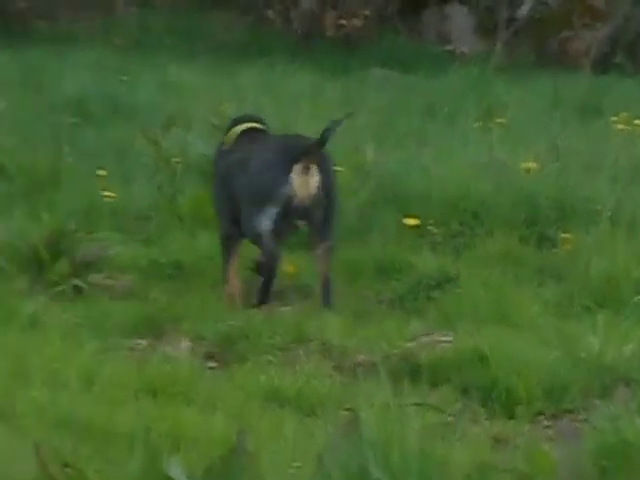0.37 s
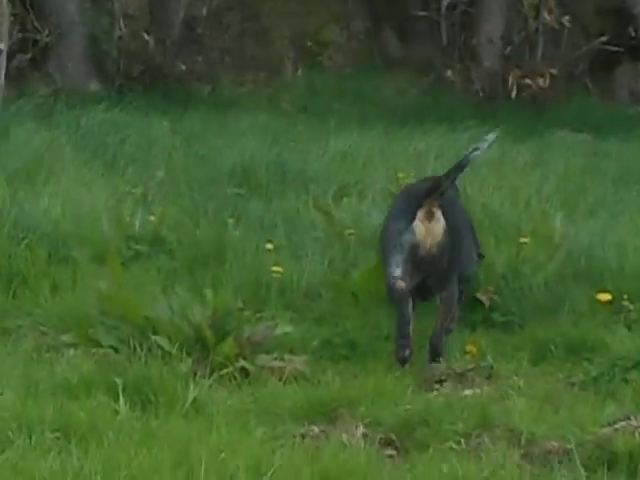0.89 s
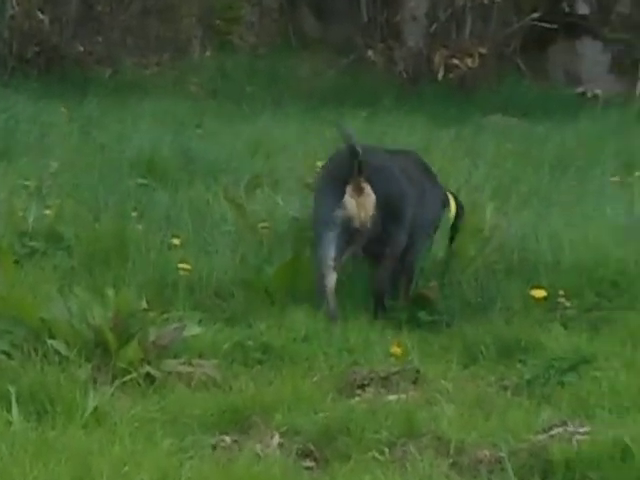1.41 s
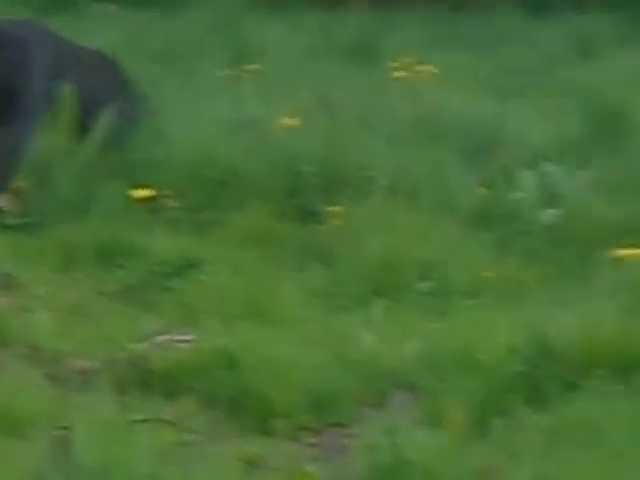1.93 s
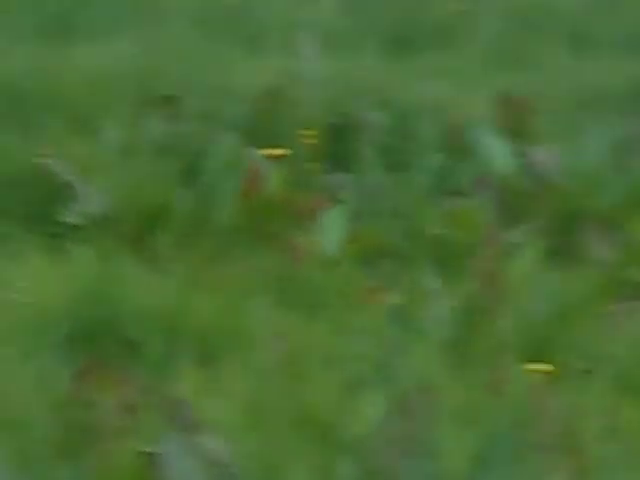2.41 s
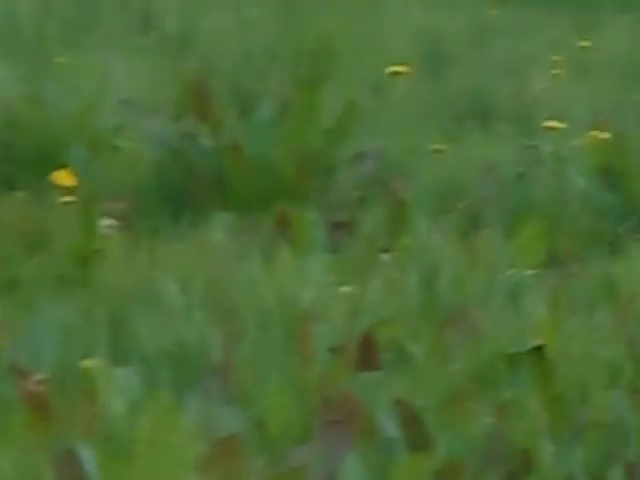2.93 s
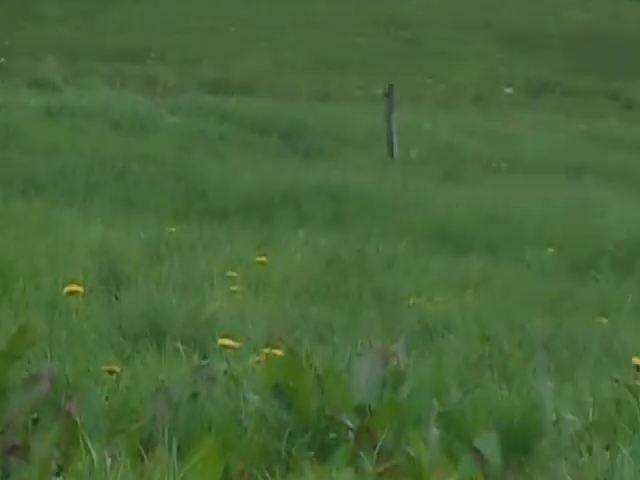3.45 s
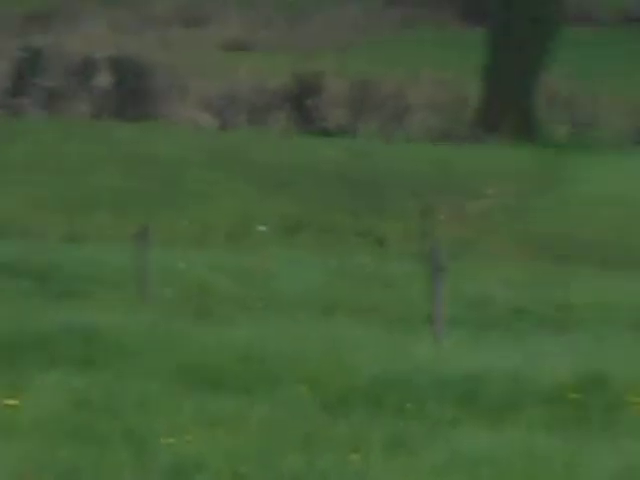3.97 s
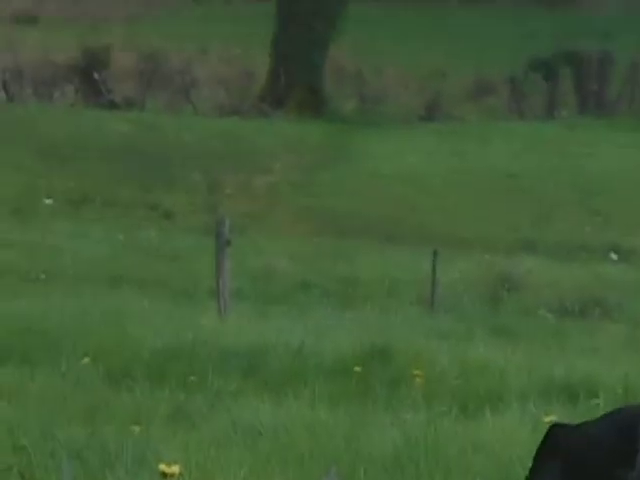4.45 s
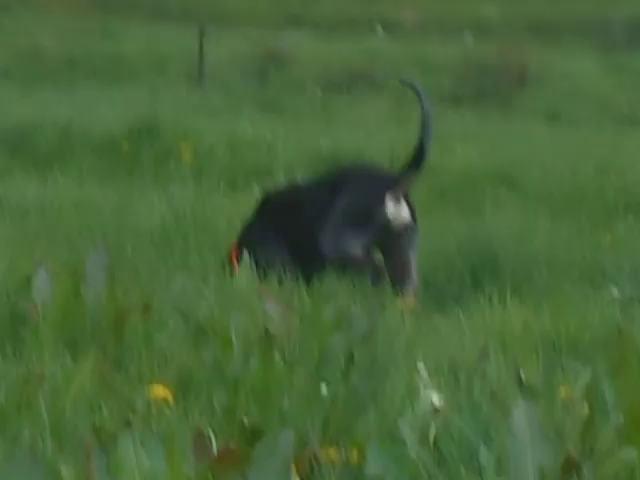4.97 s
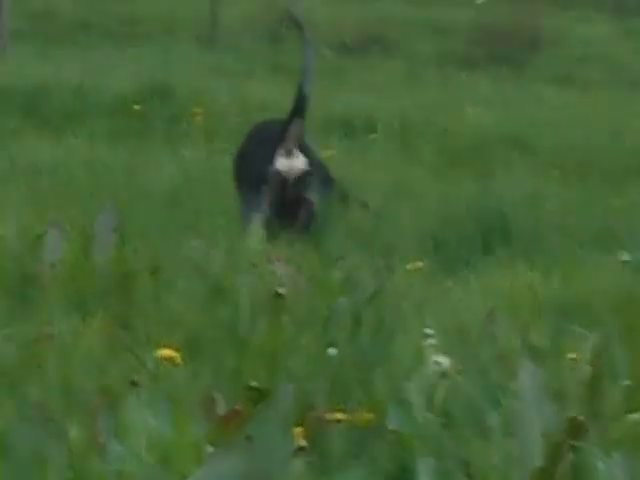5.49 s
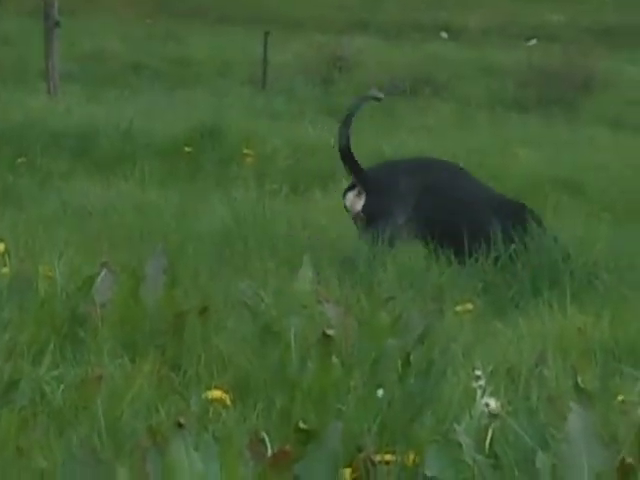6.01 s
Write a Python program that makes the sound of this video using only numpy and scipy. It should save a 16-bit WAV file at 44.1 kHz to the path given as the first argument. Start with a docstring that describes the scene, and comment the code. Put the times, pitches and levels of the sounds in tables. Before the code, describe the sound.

A breezy open meadow with a soft, steady, distant noise drone. Small birds chirp from the start, clearest near 1.0-1.4 s, then fainter from 3.9 s to the end. From 0.1 s a far hammer strikes a steel post roughly every 0.57 s, eight blows ending at 4.1 s; the one at 1.8 s is loudest. Each is a hard bright crack with short metallic ringing, a quick hedge echo and a diffuse tail from the woods. A brief wind pop comes at 0.27 s. Just after 1.8 s something close snaps drily, then hollow scuffs and hissing rubs fade by 2.4 s. Tiny bright ticks occur irregularly. Wind pops the microphone around 3.4 s, then returns from 4.8 s in crowded, low, blunt bursts, strongest from 5.1 to 5.9 s, with a soft swish near 5.0 s. A brighter noisy hum grows at the end.

```python
"""A breezy meadow. Over a soft, distant drone of shaped noise, small birds whistle gliding sines from the start.
A far hammer then strikes a steel post about twice a second: noise bursts, ringing modes and echoes off hedge and woods.
Wind rumbles as gusty noise and pops as short wavelets, while small bright ticks of noise sound now and then.
Before two seconds something close by snaps and scuffs: an abrupt noise burst, then noise around a moving resonance.
Late on the wind pops crowd together and a brighter hum of noise grows."""
import sys
import numpy as np
from scipy import signal
from scipy.fft import rfft, irfft
from scipy.io import wavfile

SR = 44100
rng = np.random.default_rng(int(sys.argv[2]) if len(sys.argv) > 2 else 0)


def volts_from_db(level):
    """Convert decibel levels to linear amplitude ratios."""
    exponent = np.asarray(level, float) / 20
    return 10 ** exponent


def persist_wave(psi):
    """Save psi, clipped to +-1, as 16-bit WAV."""
    counts = np.round(np.clip(psi, -1, 1) * 32767).astype(np.int16)
    wavfile.write(sys.argv[1], SR, np.atleast_2d(counts).T)


N = 269802


def rms_one(x):
    """Normalisation: divides a signal by its root mean square."""
    return x / np.sqrt(np.mean(x ** 2) + 1e-20)


def in_time(rows):
    """Linear interpolation of (time_s, value) rows at every sample."""
    s, value = np.transpose(rows)
    return np.interp(np.arange(N) / SR, s, value)


def coloured(spectrum, size=N):
    """Spectral shaping: white noise filtered to the given spectrum, rms 1."""
    hz, db = np.transpose(spectrum)
    grid_hz = np.maximum(np.arange(size // 2 + 1) * SR / size, 1)
    # levels follow log frequency and drop 30 dB outside the table
    gain_db = np.interp(np.log(grid_hz), np.log(hz), db, db[0] - 30, db[-1] - 30)
    return rms_one(irfft(rfft(rng.standard_normal(size)) * volts_from_db(gain_db), size))


def drift(rate_hz):
    """Random modulation: noise through a double-pole low-pass, rms 1."""
    r = np.exp(-2 * np.pi * rate_hz / SR)
    noise = rng.standard_normal(N + SR)
    return rms_one(signal.lfilter([1], [1, -2 * r, r * r], noise)[SR:])


def ring(x, hz, t60):
    """Damped resonance: a unit click starts a sine of height 1 that falls 60 dB in t60 seconds."""
    r = volts_from_db(-60 / (t60 * SR))
    w = 2 * np.pi * hz / SR
    return signal.lfilter([0, np.sin(w)], [1, -2 * r * np.cos(w), r * r], x)


def burst(t, rise, fall):
    """Exponential build-up and decay from t = 0, with time constants in seconds."""
    t = np.maximum(t, 0)
    return (1 - np.exp(-t / rise)) * np.exp(-t / fall)


def wavelet(t, hz, turns, phase):
    """Time-limited oscillation: a few turns of a tone under a Gaussian bell."""
    return np.exp(-(t * hz / turns) ** 2) * np.cos(2 * np.pi * hz * t + phase)


def stroke(length):
    """Friction envelope: swells, holds and fades along squared sines."""
    rise_share, fade_share = 0.12, 0.5
    u = np.linspace(0, 1, round(length * SR))
    ramps = np.minimum(u / rise_share, (1 - u) / fade_share)
    return np.sin(np.pi / 2 * np.clip(ramps, 0, 1)) ** 2


def add(out, sound, s):
    """Superposition: adds a sound to out, starting s seconds in."""
    at = max(round(s * SR), 0)
    out[at:at + len(sound)] += sound[:N - at]


# spectrum of the distant drone: pitch_hz [Hz], level_db [dB per Hz]
DRONE_SPECTRUM = [(120, -37.5), (200, -20), (487, -7), (1200, 3.5), (1490, -5), (2370, -5), (2610, -7),
                  (6580, -16.5), (8990, -23.5), (10300, -32.5), (13300, -55.5), (22000, -120)]
# course of the drone: time_s [s], level_db [dB]
DRONE_COURSE = [(0.0, -57), (1.87, -58), (5.45, -58), (6.12, -57)]


def drone():
    """Stationary noise: a fixed spectrum whose level wanders slowly."""
    return volts_from_db(in_time(DRONE_COURSE) + 0.56 * drift(3.4)) * coloured(DRONE_SPECTRUM)


# course of the brighter hum: time_s [s], level_db [dB]
HUM_COURSE = [(4.5, -73), (5.4, -68.5), (5.9, -60), (6.12, -61)]
# spectrum of the brighter hum: pitch_hz [Hz], level_db [dB per Hz]
HUM_SPECTRUM = [(700, -19), (1300, 0.5), (2000, -2.5), (2600, -10), (4000, -27)]


def hum():
    """Amplitude modulation: mid-band noise that grows towards the end."""
    return volts_from_db(in_time(HUM_COURSE)) * coloured(HUM_SPECTRUM)


# steady breeze: time_s [s], level_db [dB]
BREEZE_COURSE = [(0.0, -78), (1.7, -78), (2.2, -73), (2.7, -77), (3.3, -67.5), (3.75, -71.5), (4.3, -77.5),
                 (5.3, -58), (6.12, -62)]
# puffs of wind: middle_s [s], length_s [s], level_db [dB]
WIND_PUFFS = [(0.275, 0.073, -48), (1.305, 0.19, -74.5), (1.998, 0.046, -66.5), (2.455, .12, -69.5),
              (2.785, 0.075, -63), (3.117, 0.064, -59.5), (3.223, .15, -59), (3.445, 0.13, -49),
              (3.6, 0.054, -64.5), (3.97, 0.13, -58), (4.187, 0.22, -61.5), (4.417, 0.041, -55),
              (4.64, 0.21, -60.5), (4.837, 0.044, -47), (4.99, 0.066, -62), (5.131, 0.084, -44.5),
              (5.245, 0.077, -50), (5.545, 0.073, -42), (5.736, 0.11, -55), (5.889, 0.054, -43.5),
              (6.026, 0.063, -48)]


def gust_strength():
    """Superposed flow: Gaussian puffs ride on a slowly changing breeze."""
    t = np.arange(N) / SR
    gust = volts_from_db(in_time(BREEZE_COURSE))
    for middle, length, db in WIND_PUFFS:
        gust = gust + volts_from_db(db) * np.exp(-(2 * (t - middle) / length) ** 2)
    return gust


# spectrum of wind on the microphone: pitch_hz [Hz], level_db [dB per Hz]
RUMBLE_SPECTRUM = [(15, 1.5), (30, 1), (60, -0.5), (130, -2), (250, -14.5), (450, -17), (900, -49)]


def wind_rumble(gust):
    """Turbulent pressure: low noise follows the gusts with a lumpy level."""
    return gust * volts_from_db(4 * drift(35)) * coloured(RUMBLE_SPECTRUM)


# hard wind pops, before the bass cut: middle_s [s], level_db [dB], pitch_hz [Hz]
HARD_POPS = [(0.255, -33.5, 206), (0.273, -39.5, 171), (3.378, -36, 297), (3.39, -31, 207),
             (3.471, -26.5, 303), (4.825, -31.5, 302), (4.843, -36.5, 253), (4.995, -28.5, 242),
             (5.03, -34, 193), (5.101, -34, 157), (5.126, -20.5, 234), (5.161, -25.5, 271),
             (5.23, -35.5, 230), (5.246, -37, 234), (5.529, -25.5, 180), (5.545, -24.5, 330),
             (5.56, -27.5, 320), (5.697, -32.5, 190.0), (5.748, -21, 330), (5.877, -30.5, 163),
             (5.893, -27, 232), (5.98, -34, 176)]


def wind_pops(gust):
    """Vortex shedding: each eddy pushes the diaphragm a cycle or two, with a sharp edge and a shudder."""
    gap_s, eddy_hz = 0.017, 190
    over_db, spread_db = 6.5, 1.5   # level over the gust, and its spread
    draws = rng.standard_normal((400, 3))
    shed_s = gap_s * (np.arange(len(draws)) + 3 + 0.149 * draws[:, 0])
    gust_db = 20 * np.log10(np.interp(shed_s, np.arange(N) / SR, gust))
    eddy_db = gust_db + over_db + spread_db * draws[:, 1]
    pitches = eddy_hz * np.exp(0.25 * draws[:, 2])
    eddies = [row for row in zip(shed_s, eddy_db, pitches) if row[0] < (N - 1) / SR]
    t = np.arange(-1500, 1500) / SR
    pops = np.zeros(N)
    for (s, db, hz), chance in zip([*HARD_POPS, *eddies], rng.random((500, 4))):
        push = wavelet(t, hz, 0.46, 2 * np.pi * chance[0])
        edge_t = t - 0.0019 * (chance[1] - 0.5)
        edge = wavelet(edge_t, 1.89 * hz, 0.48, 2 * np.pi * chance[2])
        shudder = wavelet(t - 0.007, 1.02 * hz, 2.0, 2 * np.pi * chance[3])
        sharpness = volts_from_db(-7.5 + 0.077 * (db + 31.5))   # harder pops are sharper
        add(pops, volts_from_db(db) * (push + sharpness * edge + volts_from_db(-14) * shudder), s + t[0])
    # the pops carry no deep bass
    return signal.sosfilt(signal.butter(2, 89, "high", fs=SR, output="sos"), pops)


# bird notes: start_s [s], length_s [s], first_hz [Hz], middle_hz [Hz], last_hz [Hz], level_db [dB]
BIRD_NOTES = [(0.019, 0.036, 7230, 6850, 6280, -63.5), (0.069, 0.014, 3010, 2840, 2420, -59),
              (0.634, 0.027, 2750, 2950, 3250, -66), (1.033, 0.067, 3170, 3260, 3340, -52),
              (1.102, 0.028, 3690, 3690, 3480, -56), (1.378, 0.093, 3900, 3840, 4040, -60),
              (1.52, 0.089, 3480, 3420, 3480, -69), (1.67, 0.13, 4880, 4630, 3870, -70),
              (3.89, .086, 7430, 8600, 7530, -72.5), (4.069, 0.07, 7100, 7940, 8550, -73),
              (4.24, .046, 7200, 7050, 6500, -64), (4.607, 0.082, 4330, 4370, 4470, -71),
              (4.824, 0.058, 4440, 4310, 4220, -67), (5.318, 0.095, 4200, 4060, 4150, -68),
              (5.48, .06, 6750, 6400, 5750, -73), (5.52, 0.081, 4100, 4040, 4010, -74),
              (6.034, 0.018, 3580, 3680, 3750, -68), (6.07, 0.042, 4020, 3990, 4000, -60.5)]


def birds():
    """Frequency modulation: sines glide through three pitches, waver on the way here and echo faintly from trees."""
    notes = np.zeros(N)
    for s, length, first, middle, last, db in BIRD_NOTES:
        u = np.linspace(-1, 1, round(length * SR))
        hz = middle + (last - first) / 2 * u + ((first + last) / 2 - middle) * u ** 2
        whistle = np.sin(2 * np.pi * np.cumsum(hz) / SR)
        shape = (1 - u ** 2) ** 0.6   # a smaller power holds the level closer to the ends
        add(notes, volts_from_db(db) * np.sqrt(2) * shape * whistle, s)
    notes = notes * volts_from_db(1.8 * drift(40))
    t = np.arange(SR // 4) / SR
    trees = np.exp(-t / 0.086) * rng.standard_normal(len(t))
    return notes + volts_from_db(-37.5) * signal.fftconvolve(notes, trees)[:N]


# small bright ticks: start_s [s], level_db [dB]
TICK_TIMES = [(0.2044, -44.5), (0.5223, -52.5), (1.4825, -48), (2.106, -43.5), (2.2764, -39), (3.2854, -46),
              (3.912, -50), (4.238, -43), (4.2712, -44.5), (4.377, -62), (4.975, -46), (5.2227, -50)]
# spectrum of a tick: pitch_hz [Hz], level_db [dB per Hz]
TICK_SPECTRUM = [(1000, -23), (3000, -3), (6500, -3), (9000, -5), (10500, -18)]


def ticks():
    """Impulsive excitation: bright noise that dies away within milliseconds."""
    out = np.zeros(N)
    t = np.arange(600) / SR
    for s, db in TICK_TIMES:
        add(out, volts_from_db(db) * burst(t, 0.00037, 0.0012) * coloured(TICK_SPECTRUM, len(t)), s)
    return out


# spectrum of the close snap, before the bass cut: pitch_hz [Hz], level_db [dB per Hz]
SNAP_SPECTRUM = [(88, -52), (150, -28), (736, -10.5), (1490, -6), (2280, -7.5), (2870, 5), (3490, -9),
                 (4090, -1.5), (4970, -18.5), (7600, -9), (10300, -27), (13300, -53.5), (22000, -120)]


def snap():
    """Sudden release: noise climbs and falls exponentially about a sharp peak, with a low wavelet as its body."""
    peak_s, rise_s, fall_s = 1.835, 0.0025, 0.0011
    t = np.arange(N) / SR - peak_s
    envelope = np.exp(-np.abs(t) / np.where(t < 0, rise_s, fall_s))
    crack = volts_from_db(-7.5) * envelope * coloured(SNAP_SPECTRUM)
    dry_crack = signal.sosfilt(signal.butter(2, 1100, "high", fs=SR, output="sos"), crack)
    return dry_crack + volts_from_db(-31.5) * wavelet(t, 378, 0.5, 0)


# spectrum of the wood and earth under the post: pitch_hz [Hz], level_db [dB per Hz]
KNOCK_SPECTRUM = [(500, -27), (800, -13), (980, 3.5), (1300, -8.5), (2100, 0), (2700, -5.5), (4000, -32)]


def knock_noise(size=N):
    """Broad resonance: noise in the colour of the knock, which the scuffs share."""
    return coloured(KNOCK_SPECTRUM, size)


# scuffs: start_s [s], length_s [s], level_db [dB], first_hz [Hz], last_hz [Hz] of the hollow resonance
SCUFF_STROKES = [(1.835, 0.064, -45, 2900, 2710), (1.942, .14, -46.5, 3044, 2333),
                 (2.051, 0.069, -50, 1872, 1575), (2.1, .13, -47, 2913, 2490), (2.19, .09, -55, 2840, 2740),
                 (2.27, 0.15, -57.5, 2900, 2830)]
# soft swishes: start_s [s], length_s [s], level_db [dB]
SWISH_STROKES = [(1.072, 0.2, -64.5), (1.502, 0.23, -63), (1.827, 0.073, -62.5), (2.178, 0.14, -54),
                 (4.979, 0.072, -57)]
# spectrum of the hiss of rubbing: pitch_hz [Hz], level_db [dB per Hz]
HISS_SPECTRUM = [(1500, -12.5), (4000, 0.5), (4900, -9.5), (5650, -0.5), (6300, -8.5), (7200, 0.5),
                 (8200, -12.5), (9300, -9), (10500, -19)]


def rubbing():
    """Friction noise: scuffs excite a sinking hollow resonance and hiss; swishes only hiss."""
    # low-passed noise times a tone becomes a band around that tone
    low_pass = signal.butter(2, 330, fs=SR, output="sos")
    band = rms_one(signal.sosfilt(low_pass, rng.standard_normal(N)))
    hollow, scuff, swish = np.zeros((3, N))
    for s, length, db, first_hz, last_hz in SCUFF_STROKES:
        shape = volts_from_db(db) * stroke(length)
        phase = 2 * np.pi * np.cumsum(np.linspace(first_hz, last_hz, len(shape))) / SR
        # a second resonance lies below the first
        centre = np.sin(phase) + volts_from_db(-7.5) * np.sin(0.8 * phase)
        add(hollow, np.sqrt(2) * shape * centre, s)
        add(scuff, shape, s)
    for s, length, db in SWISH_STROKES:
        add(swish, volts_from_db(db) * stroke(length), s)
    thud = volts_from_db(-5.5) * scuff * knock_noise()
    hiss = (swish + volts_from_db(-8.5) * scuff) * coloured(HISS_SPECTRUM)
    return (hollow * band + thud + hiss) * volts_from_db(0.63 * drift(361))   # fibres catch and slip


# hammer blows: start_s [s], level_db [dB, scales the whole blow], knock_db [dB, knock within the blow]
HAMMER_BLOWS = [(0.098, -28, -10.5), (0.665, -25, -13), (1.216, -24, -9.5), (1.792, -21.5, -14),
                (2.38, -26.5, -9.5), (2.972, -25.5, -6.5), (3.551, -25, -9), (4.127, -25, -7)]
# modes of the steel post: pitch_hz [Hz], level_db [dB, relative], t60_s [s]
POST_MODES = [(2094, -13, 0.038), (2630, -8, 0.0084), (3100, -5, 0.069), (3170, -2.5, 0.042),
              (3750, -13, 0.15), (4257, -7, 0.088), (4310, -10.5, 0.14), (5270, -23, .07),
              (5460, -4, 0.031), (5550, -12, 0.11), (6127, -6, 0.056), (6340, -22, 0.033), (6850, -14, .07),
              (7190, -14, 0.071), (7660, -17.5, 0.047), (8820, -21.5, 0.093)]
# spectrum of the crack of a blow: pitch_hz [Hz], level_db [dB per Hz]
CRACK_SPECTRUM = [(700, -33), (1100, -2.5), (3000, 2.5), (6000, 3.5), (7400, -14), (8200, -27),
                  (10300, -33)]
# echoes off the hedge, near wood and far wood: delay_s [s], level_db [dB re direct]
BLOW_ECHOES = [(0.038, -7), (.126, -26.5), (0.161, -16.5)]


def hammer():
    """Modal excitation and multipath: crack and ring arrive directly, by echoes and in a scattered tail."""
    flutter_db = 4.5
    out = np.zeros(N)
    t = np.arange(SR // 2 + SR // 4) / SR
    direct = burst(t, 0.0005, 0.0078)
    hedge_scatter = volts_from_db(-9) * burst(t - 0.02, 0.012, 0.02)
    woods_scatter = volts_from_db(-19) * burst(t - 0.005, 0.021, 0.16)
    paths = direct + hedge_scatter + woods_scatter
    for delay, level_db in BLOW_ECHOES:
        paths = paths + volts_from_db(level_db) * burst(t - delay, 0.00025, 0.0065)
    for s, db, knock_db in HAMMER_BLOWS:
        crack = paths * coloured(CRACK_SPECTRUM, len(t))
        knock = (direct + 0.16 * paths) * knock_noise(len(t))   # leaves scatter little bass
        taps = paths * rng.standard_normal(len(t))
        strengths = volts_from_db(2.8 * rng.standard_normal(len(POST_MODES)))   # no two blows land alike
        steel = 0
        for strength, (hz, level_db, t60) in zip(strengths, POST_MODES):
            # moving air and leaves make each partial flutter
            flutter = np.interp(t, np.arange(80) / 100, rng.standard_normal(80))
            steel = steel + strength * volts_from_db(level_db + flutter_db * flutter) * ring(taps, hz, t60)
        blow = volts_from_db(-8.5) * crack + volts_from_db(knock_db) * knock + volts_from_db(-34) * steel
        add(out, volts_from_db(db) * blow, s)
    # the blows hold little below 750 Hz or above 8.5 kHz
    return signal.sosfilt(signal.butter(3, [750, 8500], "band", fs=SR, output="sos"), out)


def scene():
    """Linear superposition: the pressures of all sources add at one microphone."""
    gust = gust_strength()
    wind = wind_rumble(gust) + wind_pops(gust)
    close_by = ticks() + snap() + rubbing()
    return (drone() + hum() + wind + birds() + close_by + hammer())[None]


def band_limit(x):
    """A steep low-pass at the top of the band."""
    return signal.sosfilt(signal.butter(12, 10410, fs=SR, output="sos"), x)


def record(dry):
    """Band limiting: the deepest bass is thinned and the top is cut steeply."""
    bass_cut = signal.butter(1, 39, "high", fs=SR, output="sos")
    top_cut = signal.cheby2(8, 30, 11250, fs=SR, output="sos")   # 30 dB down from 11250 Hz
    mix = signal.sosfilt(np.vstack([bass_cut, top_cut]), dry)
    return band_limit(mix)


dry = scene()
out = record(dry)
persist_wave(out)
```